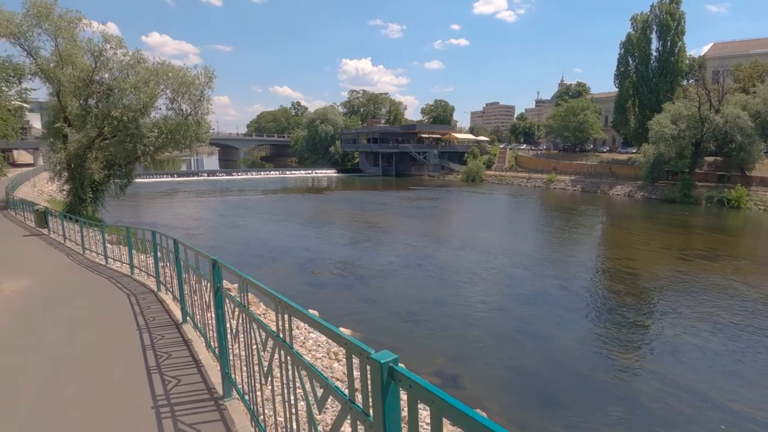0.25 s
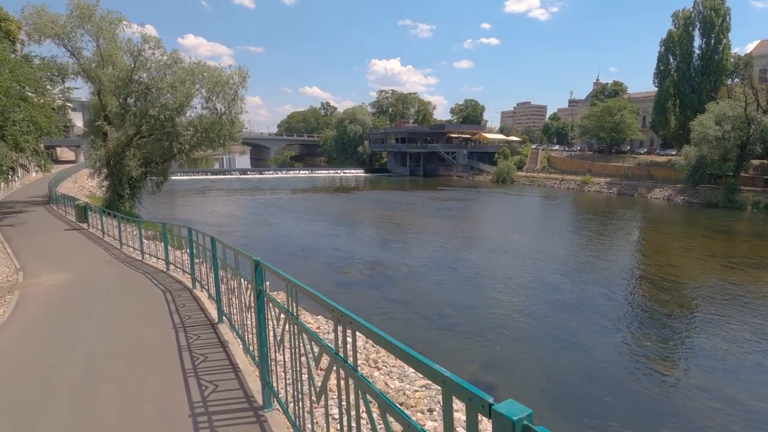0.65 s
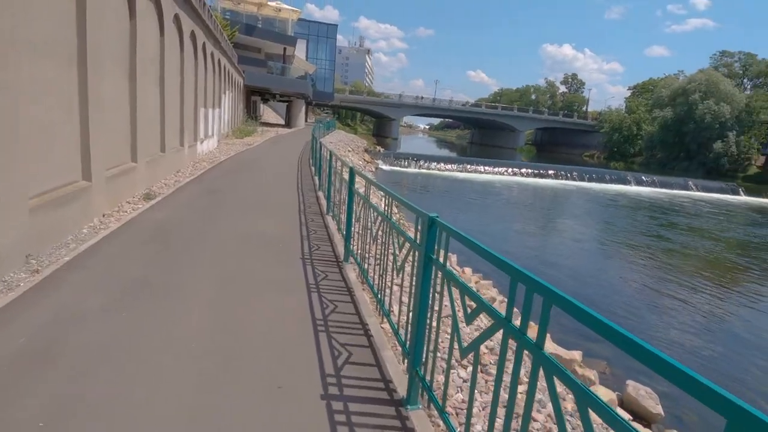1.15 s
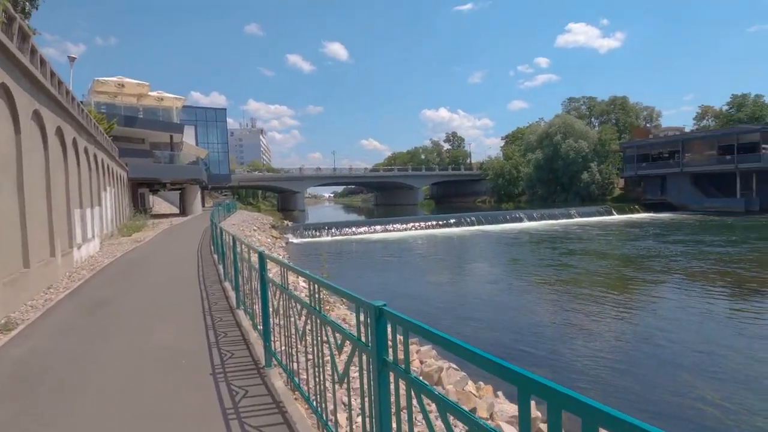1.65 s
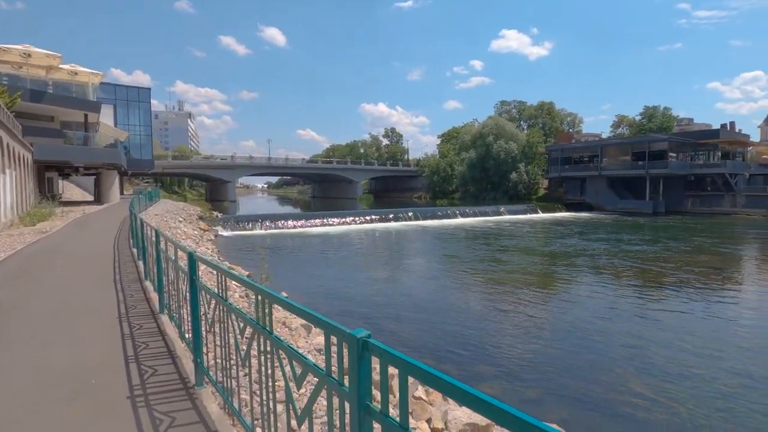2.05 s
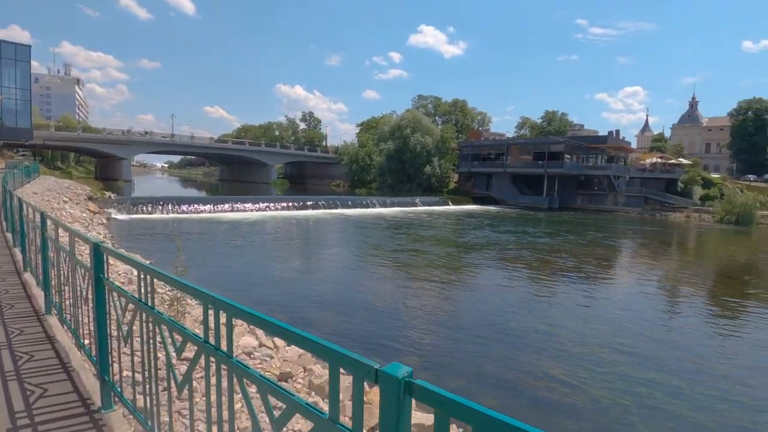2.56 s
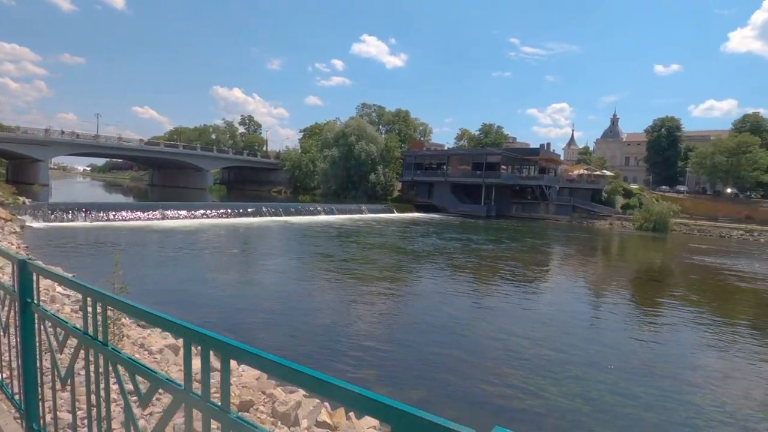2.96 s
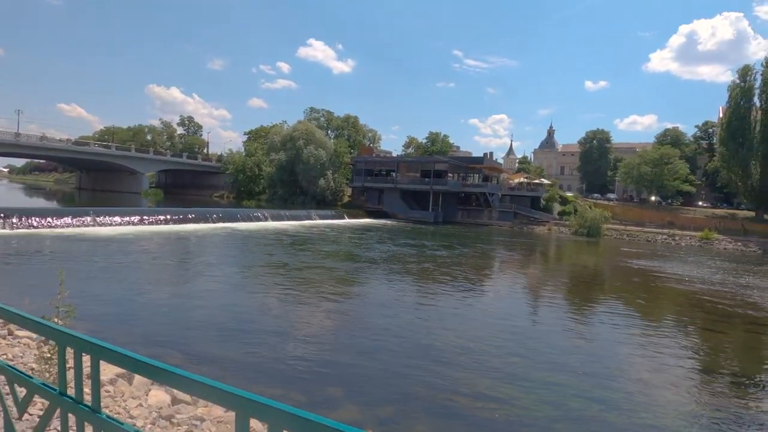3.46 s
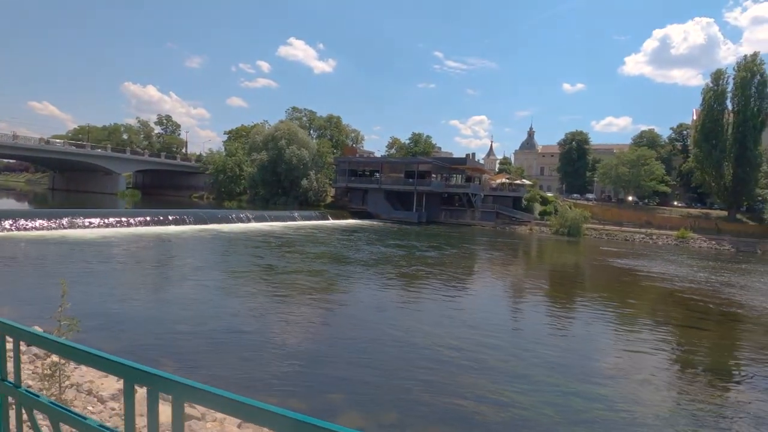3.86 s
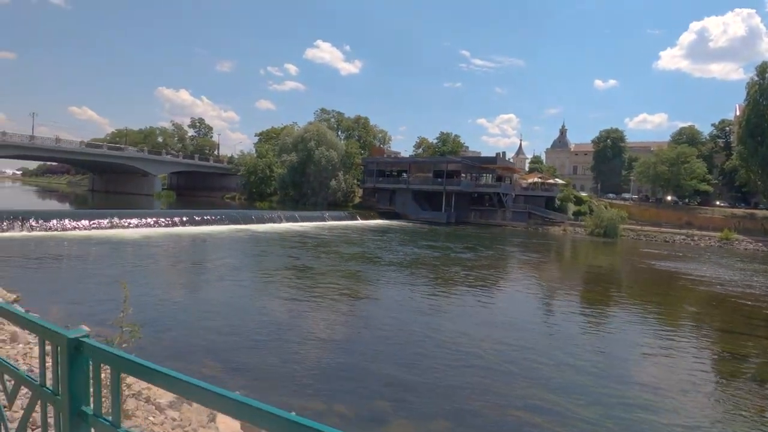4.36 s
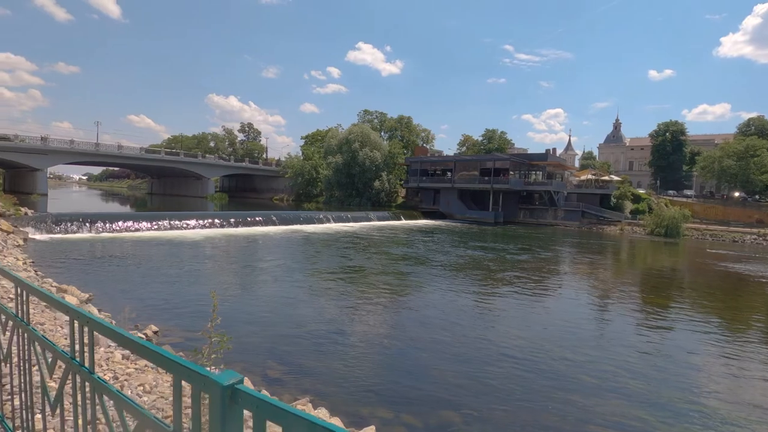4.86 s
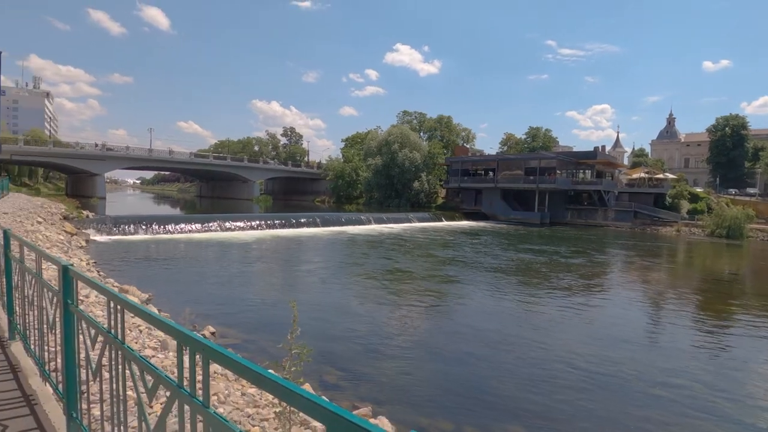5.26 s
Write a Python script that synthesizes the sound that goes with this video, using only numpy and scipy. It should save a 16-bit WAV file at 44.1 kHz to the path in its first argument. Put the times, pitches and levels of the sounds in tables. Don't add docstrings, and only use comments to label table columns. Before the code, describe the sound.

Distant weir roar over low traffic rumble clicks off, a brief silence, then a louder, closer rush of water with faint engine drone and handling rustle.

```python
import sys
import numpy as np
from scipy import signal
from scipy.io import wavfile
from scipy.ndimage import uniform_filter1d

SR = 44100
rng = np.random.default_rng(int(sys.argv[2]) if len(sys.argv) > 2 else 0)


def file_out(sig):
    cols = np.atleast_2d(sig).T
    lim = np.clip(cols, -1, 1)
    pcm = np.round(lim * 32767).astype(np.int16)
    wavfile.write(sys.argv[1], SR, pcm)


def rack_gain(trim_db):
    fader = np.asarray(trim_db, float)
    return 10 ** (fader / 20)


N = 242991


def evened(x):
    return x / np.sqrt(np.mean(x ** 2) + 1e-20)


def column(rows, index):
    return np.interp(np.arange(N) / SR, [r[0] for r in rows], [r[index] for r in rows])


def humps(rows, width_s=None):
    t = np.arange(N) / SR
    return sum(r[1] * np.exp(-((t - r[0]) / (width_s or r[2])) ** 2) for r in rows)


def wash(colour, length, size, patchy_db, flicker_db):
    frames = 4 * length // size + 5
    hz = np.fft.rfftfreq(size, 1 / SR)
    real, imaginary, patches = rng.standard_normal((frames, len(hz), 3)).T
    patches = uniform_filter1d(patches, size=size // 100, axis=0)
    patches = evened(uniform_filter1d(patches, size=8, axis=1))
    flicker = evened(uniform_filter1d(rng.standard_normal(frames), size=4))
    f, db = np.transpose(colour)
    shape_db = np.interp(np.log(hz + 1), np.log(f + 1), db, left=-100, right=-100)
    level_db = shape_db[:, None] + patchy_db * patches + flicker_db * flicker
    spectra = (real + 1j * imaginary) * rack_gain(level_db)
    sound = signal.istft(spectra, nperseg=size, noverlap=3 * size // 4)[1]
    return np.pad(evened(sound[:length]), (0, N - length))


# [Hz, dB per Hz]
RUMBLE_COLOUR = [(12, -10), (25, -13.5), (40, 1.5), (52, 3), (70, -3), (100, -2.5), (125, -54.5)]
# [s, dB over the rumble]
WHEEL_THUDS = [
    (.18, 3.5),
    (.6, 6),
    (1.16, 8),
    (3.2, 1),
    (3.47, 4),
    (4.3, 5),
    (4.7, 5),
    (5.02, 3),
    (5.4, 4),
]


def rumble(level_db, length):
    thuds_db = humps(WHEEL_THUDS, width_s=0.055)
    return rack_gain(level_db + thuds_db) * wash(RUMBLE_COLOUR, length, size=4096, patchy_db=0.3, flicker_db=-1.5)


# [Hz, dB per Hz]
FAR_ROAR_COLOUR = [(59, -38), (100, -17.5), (126, -3.5), (147, -9), (240, -8.5), (314, -11.5), (347, -12),
                   (484, -20.5), (651, -10), (792, -8.5), (989, -14.5), (1090, -21.5), (1360, -17.5),
                   (1900, -34), (2470, -57), (4180, -120)]
NEAR_ROAR_COLOUR = [(62, -51), (105, 2), (113, -33), (119, -5.5), (173, -4.5), (287, -8.5), (433, -7),
                    (559, -11.5), (747, -7.5), (1640, -23), (1900, -33), (2470, -44), (4180, -120)]


def roar(level_db, is_near, length):
    colour = NEAR_ROAR_COLOUR if is_near else FAR_ROAR_COLOUR
    return rack_gain(level_db) * wash(colour, length, size=2048, patchy_db=0.8, flicker_db=-0.04)


# [Hz, dB per Hz]
FAR_SPRAY_COLOUR = [(1650, -46), (1850, -17), (2000, -9), (2200, -1), (2400, -10), (3200, -7.5), (4700, -7),
                    (5400, -18), (5900, -22.5), (6500, -18), (7100, -20), (7900, -27.5), (8200, -39)]
NEAR_SPRAY_COLOUR = [(1650, -43), (1850, -16), (2000, -3), (2170, 1), (2330, -8), (3200, -4.5), (4650, -5),
                     (5200, -14), (5550, -15.5), (5950, -18.5), (7150, -14), (8000, -23), (8300, -43)]


def spray(level_db, is_near, length):
    colour = NEAR_SPRAY_COLOUR if is_near else FAR_SPRAY_COLOUR
    return rack_gain(level_db) * wash(colour, length, size=1024, patchy_db=0.7, flicker_db=0.2)


# [Hz, dB per Hz]
FAR_MIST_COLOUR = [(7700, -27), (8050, -6), (8700, -0.5), (9200, -6), (9600, -5.5), (10100, -9),
                   (10400, -18), (11000, -18.5), (12600, -23), (12900, -34), (15500, -62)]
NEAR_MIST_COLOUR = [(7700, -20), (8080, -7), (8600, -0.5), (9700, -6.5), (10700, -14), (12200, -14.5),
                    (13000, -22), (14200, -26), (14600, -34), (15500, -47)]


def mist(level_db, is_near, length):
    colour = NEAR_MIST_COLOUR if is_near else FAR_MIST_COLOUR
    return rack_gain(level_db) * wash(colour, length, size=512, patchy_db=1.0, flicker_db=.5)


def river(levels_db, is_near, length):
    rumble_db, roar_db, spray_db, mist_db = levels_db
    low = rumble(rumble_db, length) + roar(roar_db, is_near, length)
    high = spray(spray_db, is_near, length) + mist(mist_db, is_near, length)
    return low + high


# rumble, roar, spray, mist level/dB [dB]
FAR_LEVELS = (-39.5, -35, -54, -75)


def far_spot():
    t = np.arange(N) / SR
    rumble_db, roar_db, spray_db, mist_db = FAR_LEVELS
    mist_db = mist_db - 4 * (t > .38)
    return river((rumble_db, roar_db, spray_db, mist_db), is_near=False, length=SR)


# rumble, roar, spray, mist level/dB [dB]
NEAR_LEVELS = (-35, -28.5, -48.5, -66)
# [s, dB]
TRAFFIC_SWELL = [
    (1.1, 6.5),
    (1.45, 5),
    (1.8, 2.5),
    (2.4, -0.4),
    (3.2, 0.9),
    (4.1, -0.47),
    (5.0, 0.45),
    (5.4, 1.1),
]
SWELL_SHARES = (0.31, 0.95, 0.21, 0.03)


def near_spot():
    swell_db = column(TRAFFIC_SWELL, index=1)
    levels_db = [db + share * swell_db for db, share in zip(NEAR_LEVELS, SWELL_SHARES)]
    return river(levels_db, is_near=True, length=N)


# [s, Hz, dB]
ENGINE_DRONE = [(1.0, 83.1, -27), (1.2, 87.4, -25), (1.55, 84.68, -25.5), (2.0, 82.85, -23.5),
                (2.4, 82.34, -25), (2.55, 82.57, -30.5), (3.0, 83.3, -32), (3.6, 83.8, -24.5),
                (3.95, 85.7, -27), (4.75, 86.36, -29), (4.88, 88.9, -28.5), (5.2, 87.1, -32),
                (5.5, 87.8, -31.5)]
# [s, dB, s]
DRONE_FADES = [(1.24, -24, 0.044), (1.46, -17, 0.023), (1.63, -17, 0.053), (1.87, -5.5, 0.041),
               (2.17, -10, 0.036), (2.87, -12, 0.028), (3.1, -7, 0.076), (3.72, -7, 0.057),
               (4.81, -12, .03), (5.27, -12, 0.032), (5.45, -14, 0.029)]


def drone():
    pitch_hz = uniform_filter1d(column(ENGINE_DRONE, index=1), size=4000)
    cycles = np.cumsum(pitch_hz) / SR
    level_db = column(ENGINE_DRONE, index=2) + humps(DRONE_FADES)
    return np.sqrt(2) * rack_gain(level_db) * np.sin(2 * np.pi * cycles)


# [Hz, dB per Hz]
TYRE_COLOUR = [(1060, -37), (1800, -9), (1930, -3), (2190, 1.5), (2510, -12), (2880, -3), (3990, -5),
               (4470, -2.5), (5910, -15.5), (6770, -16.5), (8060, -31), (8700, -21), (9970, -31),
               (11000, -48), (14300, -70), (22000, -120)]


def car():
    level_db, hold_s, fade_db_per_s = -38.5, 1.104, 14
    leaving_s = np.maximum(np.arange(N) / SR - hold_s, 0)
    hiss = wash(TYRE_COLOUR, 4 * SR, size=1024, patchy_db=0.1, flicker_db=1.2)
    return rack_gain(level_db - fade_db_per_s * leaving_s) * hiss


def resonate(x, hz, width):
    turn = np.exp(2j * np.pi * hz * np.arange(len(x)) / SR)
    r = np.exp(-np.pi * width / SR)
    return 2 * (turn * signal.lfilter([1 - r], [1, -r], x / turn)).real


def resonate_twice(x, hz, width):
    return resonate(resonate(x, hz, width), hz, width)


def rung(x, modes):
    return evened(sum(rack_gain(db) * evened(resonate_twice(x, hz, width)) for hz, width, db in modes))


# [s, s, dB, dB]
SLEEVE_STROKES = [
    (1.209, 0.098, -38, -62),
    (1.325, 0.041, -46, -57),
    (1.38, .05, -60, -62),
]


def pressure(index):
    rise_s, release_db_per_s = .015, 500
    t = 1 + np.arange(SR) / SR
    total = 0
    for stroke in SLEEVE_STROKES:
        start_s, length_s = stroke[:2]
        rise = np.clip((t - start_s) / rise_s, 0, 1) ** 2
        released_s = np.maximum(t - start_s - length_s, 0)
        total = total + rise * rack_gain(stroke[index] - release_db_per_s * released_s)
    return total


# [Hz, Hz, dB]
SHELL_MODES = [(1546, 440, 4), (2080, 190, 1), (4280, 1100, 2), (5490, 320, -0.5), (6940, 500, -8)]
FIBRE_MODES = [(7540, 700, 8), (8900, 830, 6), (10000, 700, 3), (11700, 1200, -4)]
# [s, dB, Hz, Hz]
SHELL_TICKS = [
    (1.255, -49, 11800, 2200),
    (1.255, -41, 8700, 900),
    (1.255, -42, 7000, 700),
    (1.254, -19.5, 1450, 350),
    (4.035, -47, 5500, 400),
]


def sleeve():
    snaps = rng.standard_normal(SR) * rack_gain(1.4 * rng.exponential(1, SR))
    out = np.zeros(N)
    out[SR:2 * SR] += pressure(index=2) * rung(snaps, SHELL_MODES)
    out[SR:2 * SR] += pressure(index=3) * rung(snaps, FIBRE_MODES)
    t = np.arange(1500) / SR
    for start_s, db, hz, width in SHELL_TICKS:
        burst = rng.standard_normal(len(t)) * np.exp(-(t / .002) ** 2)
        tick = resonate_twice(burst, hz, width)
        out[round(start_s * SR):][:len(t)] += rack_gain(db) * tick / abs(tick).max()
    return signal.sosfilt(signal.butter(8, 13000, fs=SR, output="sos"), out)


def scene():
    cut_s, back_s, fade_s = .7711, .948, 0.083
    step_db = -32.5
    t, cut = np.arange(N) / SR, round(cut_s * SR)
    far = far_spot()
    near = near_spot() + drone() + car() + sleeve()
    far = far + (rack_gain(step_db) - far[cut]) * np.exp(-((t - cut_s) / .0004) ** 2)
    fade = np.clip((t - back_s) / fade_s, 0, 1) ** 1.35
    return (far * (np.arange(N) <= cut) + fade * near)[None]


def top_cut(x):
    return signal.sosfilt(signal.butter(12, 15590, fs=SR, output="sos"), x)


def record(dry):
    return top_cut(dry)


dry = scene()
out = record(dry)
file_out(out)
```